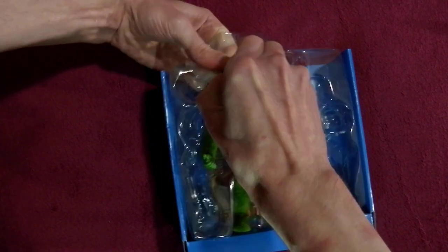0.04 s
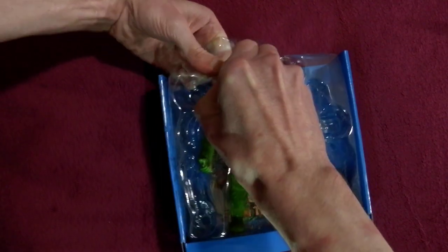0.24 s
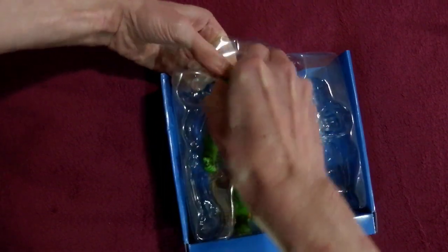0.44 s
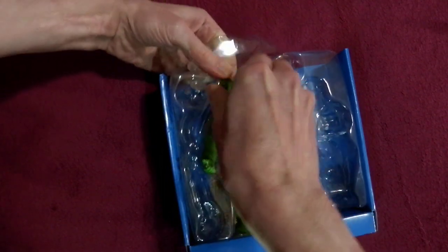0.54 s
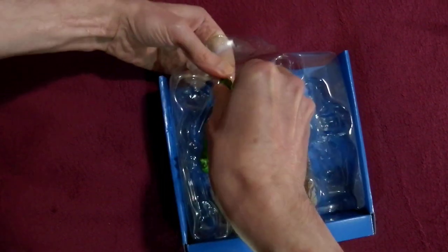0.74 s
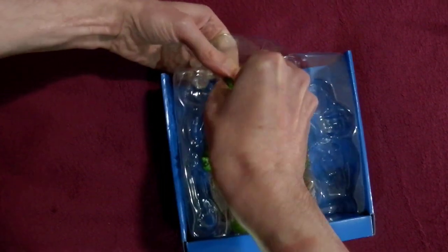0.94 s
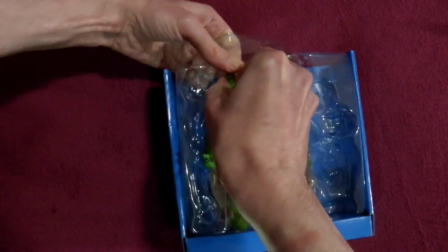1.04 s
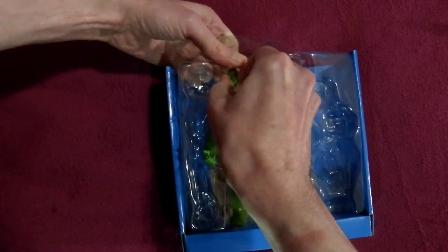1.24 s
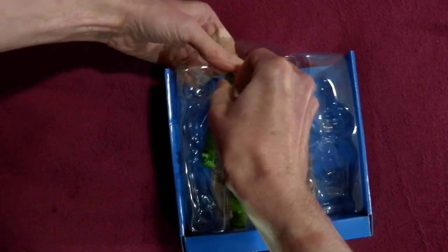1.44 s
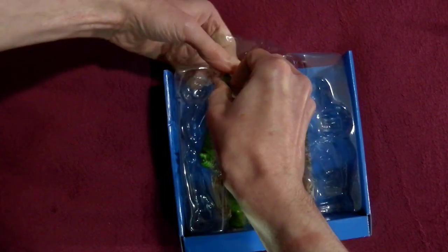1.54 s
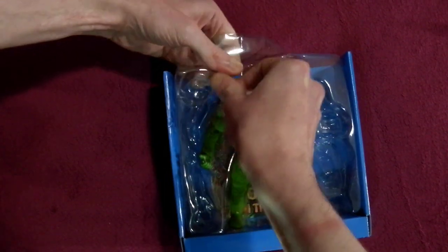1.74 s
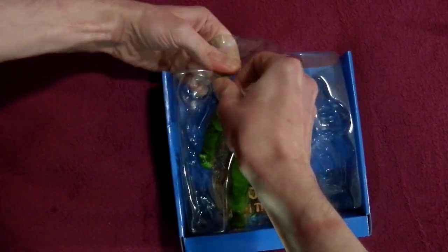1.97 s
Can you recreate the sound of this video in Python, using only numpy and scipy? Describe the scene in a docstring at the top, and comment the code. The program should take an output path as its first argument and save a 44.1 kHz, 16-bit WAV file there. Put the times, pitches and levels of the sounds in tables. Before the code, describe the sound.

Thin plastic packaging crackles under prying hands: sharp snaps at first, a quieter stretch, a dense loud burst midway, then looser crinkling with dull box thumps, recorded close in stereo in a small soft room.

```python
"""Prying a toy from its plastic tray

Hands pry a toy out of a thin plastic blister tray in a cardboard box, close to a stereo microphone.
Creases snap through and ring the sheet's short modes; tray and box thump as quickly fading tones.
Fingers rub and small creases crackle as shaped noise grains, with bass and bumps through the table.
A small soft room answers snaps and thumps with a short noise tail, over a steady room tone and hiss."""
import sys
import numpy as np
from scipy import signal
from scipy.fft import rfft, irfft
from scipy.io import wavfile
from scipy.ndimage import uniform_filter1d

SR = 44100
rng = np.random.default_rng(int(sys.argv[2]) if len(sys.argv) > 2 else 0)


def wav_record(signal):
    """Record a signal, one row per channel, as 16-bit PCM in the file named by sys.argv[1]."""
    frames = np.transpose(np.atleast_2d(signal))
    bounded = np.clip(frames, -1, 1)
    # unit amplitude maps onto the largest positive 16-bit level
    quanta = np.round(bounded * 32767).astype(np.int16)
    wavfile.write(sys.argv[1], SR, quanta)


N = 88464
T = np.arange(N) / SR

# snaps: the sheet's modes fall into a low, a middle and a high band
MIDDLE_HZ, HIGH_HZ = 4000, 8500
SNAP_DB, SCATTER_DB = -5, -3  # trim of all ringing; random spread of each mode's level
DETUNE, LOW_DETUNE = 0.0568, 0.016  # random pitch spread (fraction); low modes hardly shift
SHEET_LOW_HZ, SMALL_LOW_HZ = 1250, 3900  # the thin sheet has little bass; its upper modes even less
TICK_DB, TICK_S, TICK_LOW_HZ = -5, 0.00042, 5200  # the treble tick at the start of a snap
SNAP_RISE_S = 0.00014
RAGGED_PER_DB, LOUD_DB = 0.025, -18  # snaps weaker than this tear for longer
AFTER_DB, AFTER_S = -33, 0.004  # small cracks that follow a snap
FIRST_SLIP_DB = -3.5  # the first slip against all later ones
SLIP_CAP, SLIP_DIP = 6, 0.4  # largest raw slip; smallest response used when evening out the modes
# thumps
THUMP_DB, THUMP_CYCLES, THUMP_RISE_S = 2, 8.9, 0.00063  # an overtone falls 60 dB in this many cycles
THUMP_PHASE, THUMP_LOW_HZ = 0.4, 130  # phase scatter [radians]; the box radiates little bass
BOX_RING_DB, BOX_RING_T60_S, BOX_BEAT_HZ = -4.5, 0.061, 27.6
# handling
RUB_PER_S, RUB_SPREAD_DB, RUB_MS = 1200, 3, 7.9
COARSE_PER_S, COARSE_SPREAD_DB, COARSE_MS = 460, 4.5, 0.84
FINE_PER_S, FINE_SPREAD_DB, FINE_MS = 5000, 10, 0.52
FINE_GRAINS_DB = 2.5  # fine crackle grains against the soft rustle under them
GRAIN_CAP = 3  # limit on the random draw that sets a grain's level
SWELL_DB, SWELL_SIZE = 5, SR // 30  # uneven swelling; smoothing length [samples]
BASS_HZ = 80
# stereo: level of what differs between the ports, and of the rub's own share in it
APART_DB, RUB_APART_DB = -9.5, -5
# background
BUMP_S, BUMP_LEFT_DB = 0.0013, 12  # time to the top of the bump's envelope
TONE_DB, HISS_DB = -66.5, -86
EARLY_DB, EARLY_T60_S = -9, 0.017
ROOM_DB, ROOM_T60_S, ROOM_GAP_S = -13, 0.21, 0.011
ROOM_DULL_HZ, ROOM_TOP_T60_S = 8440, 0.24  # above this pitch the tail has its own fade
ROOM_LOW_DB = -19.5  # trim on the thumps that reach the room
TOP_HZ = 16100


def undb(db):
    """Turn decibels into a gain."""
    return 10 ** (np.asarray(db) / 20)


def unit(x):
    """Scale a sound to an rms level of 1."""
    return x / np.sqrt(np.mean(x ** 2))


def across(table, size):
    """Read a (frequency, value) table at every FFT bin, along a log frequency scale."""
    hz, value = np.array(table, float).T
    return np.interp(np.log(np.fft.rfftfreq(size, 1 / SR) + 1), np.log(hz + 1), value)


def colour(x, table):
    """Boost and cut frequencies by a table, then scale to rms 1."""
    return unit(irfft(rfft(x) * undb(across(table, N)), N))


def highpass(order, hz):
    """Make a filter that removes what lies below a frequency."""
    return signal.butter(order, hz, "highpass", fs=SR, output="sos")


def add(out, s, wave):
    """Lay a short sound down at s seconds."""
    i = max(int(s * SR), 0)
    out[..., i:i + wave.shape[-1]] += wave[..., :N - i]


def grains(per_s, spread_db, ms):
    """Scatter decaying noise grains at random times, with an exponential spread of level."""
    level = undb(spread_db * rng.exponential(size=N).clip(0, GRAIN_CAP))
    hit = (rng.random(N) < per_s / SR) * level
    decay = np.exp(-np.arange(400) / (ms * SR / 1000))
    return np.convolve(hit, decay)[:N] * rng.standard_normal(N)


def slip_burst(noise, t, tear):
    """A crease gives way in uneven slips: one at once, a burst lasting about tear, then small cracks."""
    envelope = t / tear * np.exp(-t / tear) + undb(AFTER_DB) * np.exp(-t / AFTER_S)
    # cubing makes a few slips stand out
    slips = (noise ** 3).clip(-SLIP_CAP, SLIP_CAP) * envelope
    slips[0] = undb(FIRST_SLIP_DB) * np.sqrt(np.sum(slips ** 2)) * SNAP_RISE_S / tear
    return slips / np.sqrt(np.sum(slips ** 2))


def snaps():
    """Slips of each crease ring detuned sheet modes; rows: common to both ports, differing."""
    # creases snapping through: (time [s], low level [dB], middle level [dB], high level [dB])
    snap_events = [(0.0067, -46, -43, -31), (0.0118, -45, -30, -28), (0.0175, -60, -42, -32),
                   (0.0326, -50, -57, -32), (0.0404, -52, -48, -40), (0.0515, -55, -50, -42),
                   (0.056, -33.5, -18.5, -24.5), (0.0855, -39, -59, -64), (0.0953, -47, -52, -37),
                   (0.1238, -39, -50, -37), (0.13, -34, -62, -9), (0.1378, -26.5, -24, -42),
                   (0.168, -57, -13, -17.5), (0.186, -64, -56, -18.5), (0.19, -60, -36, -30),
                   (0.2254, -25.5, -50, -14), (0.2424, -26.5, -11.5, -12), (0.299, -37, -68, -43),
                   (0.3847, -85, -62, -15), (0.3872, -32.5, -34, -23.5), (0.4067, -47, -37, -45),
                   (0.427, -46.5, -49, -43), (0.451, -48, -53, -33.5), (0.46, -50, -46, -52),
                   (0.493, -43.5, -42, -49), (0.503, -46, -54, -45.5), (0.6227, -45, -43, -44.5),
                   (0.6466, -48, -48, -49), (0.6572, -53, -49, -50), (0.665, -50, -43, -42.5),
                   (0.6827, -74, -78, -36.5), (0.7166, -52.5, -54, -51), (0.7392, -57, -45, -48.5),
                   (0.7715, -42.5, -47, -38), (0.7818, -48.5, -44, -41), (0.7973, -48, -59, -39),
                   (0.8168, -62, -49, -51), (0.8627, -43.5, -39, -37.5), (0.8973, -30.5, -31.5, -34.5),
                   (0.913, -38, -52, -30.5), (0.926, -36.5, -31, -20.5), (0.9417, -39, -39, -30),
                   (0.9541, -28, -23, -17), (0.9594, -48, -47, -27), (0.9689, -33.5, -41, -27),
                   (0.9754, -29, -43, -32), (0.9786, -23, -34, -28), (0.9851, -32, -36, -34),
                   (0.9894, -23, -15.5, -21.5), (0.9948, -36, -49, -46), (1, -56, -42, -34),
                   (1.0109, -18.5, -16, -22), (1.0154, -39, -35, -40), (1.0215, -28.5, -45, -40),
                   (1.0266, -44, -38, -38), (1.0306, -33, -44, -39), (1.0369, -47, -48, -39),
                   (1.0412, -54, -53, -57), (1.044, -43, -45, -42), (1.0593, -16, -15, -10.5),
                   (1.1092, -68, -37, -31.5), (1.153, -94, -20, -20.5), (1.265, -48, -56, -30.5),
                   (1.279, -62, -34, -43), (1.2991, -36, -37, -29), (1.3176, -51, -51, -44),
                   (1.4007, -77, -43, -41), (1.4167, -55, -55, -60), (1.4263, -53, -52, -56),
                   (1.439, -52, -57, -58), (1.4521, -45, -39, -40), (1.461, -42, -40, -54),
                   (1.4661, -45, -35, -21), (1.4724, -37.5, -35, -34), (1.4807, -47, -27, -32),
                   (1.4962, -36.5, -25, -31.5), (1.5369, -60, -32.5, -37), (1.549, -32.5, -55, -66),
                   (1.574, -31, -30, -24), (1.592, -43, -32.5, -45), (1.6294, -27.5, -26.5, -26),
                   (1.6421, -34.5, -28, -40), (1.651, -31, -28, -28), (1.6601, -29, -37, -26),
                   (1.6635, -38, -25, -30), (1.672, -60, -37, -36), (1.7424, -40, -31.5, -36),
                   (1.767, -51, -31.5, -48), (1.777, -55, -67, -33.5), (1.8122, -36.5, -55, -48),
                   (1.8155, -46, -41, -42), (1.8574, -43, -30, -31.5), (1.8668, -38, -39, -34),
                   (1.882, -38, -25.5, -28), (1.8896, -40, -28, -36), (1.8947, -36, -31.5, -26),
                   (1.9034, -34, -25, -26), (1.9122, -35, -56, -26), (1.9194, -22, -14, -15.5),
                   (1.929, -32, -28, -37), (1.9396, -39, -50, -34), (1.953, -67, -35, -46),
                   (1.9725, -41, -46, -31.5)]
    # modes of the sheet: (frequency [Hz], level within its band [dB], time to fall 60 dB [s])
    sheet_modes = [(1346, -12.5, 0.01), (1700, -12, 0.0067), (2333, 1.5, 0.011), (2997, 0, 0.0057),
                   (3450, -17.5, 0.017), (4950, -26, 0.036), (5460, -0.5, 0.022), (6290, 6.5, 0.018),
                   (7240, 20.5, 0.0086), (9290, 3.5, 0.011), (10090, 0.5, 0.0039), (11210, 4.5, 0.0032),
                   (11890, -1, 0.017), (13270, -12, 0.018)]
    out, t = np.zeros((2, N)), T[:900]
    # every mode is doubled, and detuning splits the pair
    hz, db, t60 = np.tile(np.array(sheet_modes, float), (2, 1)).T[:, :, None]
    group = ((hz > MIDDLE_HZ) * 1 + (hz > HIGH_HZ))[:, 0]
    power = np.bincount(group, undb(2 * db[:, 0]))[group]
    draw = rng.standard_normal((len(snap_events), 4, len(hz), 1))
    noise = rng.standard_normal((len(snap_events), 3, len(t)))
    treble, small = highpass(4, TICK_LOW_HZ), highpass(4, SMALL_LOW_HZ)
    rise = 1 - np.exp(-t / SNAP_RISE_S)
    for (s, *band), d, n in zip(snap_events, draw, noise):
        tear = SNAP_RISE_S * np.exp(RAGGED_PER_DB * max(LOUD_DB - max(band), 0))
        slips = slip_burst(n[2], t, tear)

        mode_db = db + SCATTER_DB * d[0] + np.array(band)[group, None] + SNAP_DB
        gain = undb(mode_db) / np.sqrt(power)[:, None]
        detune = np.where(hz > MIDDLE_HZ, DETUNE, LOW_DETUNE) * d[1]
        turn = 2 * np.pi * hz * (1 + detune) * t
        # even out how strongly this burst happens to drive each mode
        drive = np.abs(slips @ np.exp(1j * turn).T)
        gain = gain / drive.clip(SLIP_DIP)[:, None]
        ring = gain * np.exp(-np.log(1000) * t / t60)
        both = np.array([ring * np.sin(turn), ring * np.cos(turn) * d[3]])
        low = both[:, group == 0].sum(1)
        upper = signal.sosfilt(small, both[:, group > 0].sum(1))
        ringing = signal.fftconvolve(low + upper, slips[None], axes=1)[:, :len(t)]

        # a ragged tear makes the tick longer and weaker
        tick_s = TICK_S + tear
        tick = undb(band[2] + TICK_DB) * signal.sosfilt(treble, n[:2])
        tick = tick * np.exp(-t / tick_s) * np.sqrt(TICK_S / tick_s)
        add(out, s, ringing + rise * tick)
    return signal.sosfilt(highpass(4, SHEET_LOW_HZ), out)


def thumps():
    """A thump or hollow knock has overtones that fade in a few cycles, and a longer beating tone."""
    # thumps of the tray in its box; the two rows above 1 kHz are the hollow lower knock of a snap:
    # (time [s], level [dB], pitch [Hz])
    thump_events = [(0.0077, -40, 465), (0.057, -26, 724), (0.0863, -47, 495), (0.1311, -34.5, 443),
                    (0.168, -21, 659), (0.1831, -33.5, 459), (0.2247, -35, 688), (0.2254, -34, 1497),
                    (0.2429, -43, 402), (0.3022, -43.5, 444), (0.4923, -42, 614), (0.5047, -43, 403),
                    (0.6668, -41, 505), (0.719, -47, 553), (0.7717, -38.5, 324), (0.799, -39.5, 570),
                    (0.896, -36.5, 603), (0.9151, -33, 542), (0.9282, -34, 404), (0.9431, -31, 485),
                    (0.9599, -30, 381), (0.9701, -36, 516), (0.9783, -32.5, 367), (0.982, -35.5, 496),
                    (0.996, -32, 534), (1.003, -37, 528), (1.0372, -37, 415), (1.057, -37.5, 358),
                    (1.2987, -43.5, 1337), (1.418, -45.5, 440), (1.4611, -42, 408), (1.48, -38.5, 536),
                    (1.4964, -38.5, 267), (1.5404, -48, 435), (1.6612, -22, 254), (1.6612, -23, 610),
                    (1.7543, -36, 452), (1.8114, -33, 568), (1.8582, -44, 590), (1.8617, -36.5, 231),
                    (1.8825, -29, 601), (1.916, -27, 596), (1.937, -42.5, 206), (1.979, -44, 149),
                    (1.991, -46, 404)]
    # overtones of a thump or knock: (ratio to the pitch, level [dB])
    overtones = [(1.185, -4.5), (0.447, -13.5), (1.51, -21.5), (1.854, -2.5), (7.8, -36)]
    out, t = np.zeros(N), T[:4000]
    scatter = rng.standard_normal((len(thump_events), len(overtones)))
    for (s, db, hz), phases in zip(thump_events, scatter):
        ring = np.zeros(len(t))
        for (ratio, tone_db), phase in zip(overtones, phases):
            tone = np.sin(2 * np.pi * hz * ratio * t + THUMP_PHASE * phase)
            decay = np.exp(-hz * ratio * t * np.log(1000) / THUMP_CYCLES)
            ring += undb(tone_db) * tone * decay
        box = np.sin(2 * np.pi * hz * t) * np.cos(2 * np.pi * BOX_BEAT_HZ * t)
        ring += undb(BOX_RING_DB) * box * undb(-60 * t / BOX_RING_T60_S)
        add(out, s, undb(db + THUMP_DB) * ring * (1 - np.exp(-t / THUMP_RISE_S)))
    # the minus sign makes the first push go the other way
    return signal.sosfilt(highpass(2, THUMP_LOW_HZ), -out)


def hands():
    """Rub and crackle are noise grains, fine crackle lies on a soft rustle, bass is low noise."""
    # handling: (time [s], rub of tray and box level [dB], fine crackle level [dB],
    # bass through the table level [dB], coarse crackle level [dB])
    handling = [(0.0, -57, -52.5, -51.5, -69), (0.11, -53, -66, -64, -47.5), (0.24, -62.5, -56.5, -71, -60),
                (0.4, -60, -79, -66, -102), (0.469, -55.5, -72, -70, -102), (0.6, -59.5, -82, -70, -62.5),
                (0.71, -60, -77, -72.5, -63.5), (0.84, -57.5, -80.5, -57.5, -68.5),
                (0.91, -52, -87, -68, -94), (1.022, -47, -73, -56.5, -47), (1.1, -113, -64, -76, -78),
                (1.252, -65.5, -80.5, -86, -91), (1.36, -65, -73, -68, -71.5), (1.49, -56, -79, -70, -55.5),
                (1.61, -48.5, -59, -58.5, -61.5), (1.75, -48.5, -64, -59, -55.5),
                (1.88, -47, -75, -60, -54.5), (2.0, -52.5, -82, -70, -71)]
    # shaping of rub, fine crackle and coarse crackle, each: (frequency [Hz], boost [dB])
    rub_colour = [(90, -49), (140, 3), (220, 8.5), (450, 6), (720, 4.5), (900, -6.5), (1500, -16.5),
                  (3000, -25)]
    fine_colour = [(2000, 5.5), (3500, 2), (4500, 2), (7000, 9.5), (10000, 8), (13500, -2), (16000, -9)]
    coarse_colour = [(600, -12), (1000, 14.5), (2300, -3), (3500, -6.5), (6000, -1)]
    s, *levels = np.array(handling, float).T
    rub_gain, fine_gain, bass_gain, coarse_gain = (undb(np.interp(T, s, db)) for db in levels)

    # both crackles swell and fade unevenly together
    slow = uniform_filter1d(rng.standard_normal(N), SWELL_SIZE)
    swell = undb(SWELL_DB * unit(uniform_filter1d(slow, SWELL_SIZE)))

    rub = colour(grains(RUB_PER_S, RUB_SPREAD_DB, RUB_MS), rub_colour) * rub_gain
    rub_apart = colour(rng.standard_normal(N), rub_colour) * rub_gain
    coarse = colour(grains(COARSE_PER_S, COARSE_SPREAD_DB, COARSE_MS), coarse_colour)
    coarse = coarse * coarse_gain * swell

    fine = []
    for _ in range(2):
        rustle = colour(rng.standard_normal(N), fine_colour)
        crackle = colour(grains(FINE_PER_S, FINE_SPREAD_DB, FINE_MS), fine_colour)
        fine.append((rustle + undb(FINE_GRAINS_DB) * crackle) * fine_gain * swell)

    low = signal.butter(2, [25, BASS_HZ], "bandpass", fs=SR, output="sos")
    bass = unit(signal.sosfilt(low, rng.standard_normal((2, N)))) * bass_gain

    common = rub + coarse + fine[0] + bass[0]
    # the bass is raised here to cancel APART_DB in scene()
    differing = fine[1] + undb(RUB_APART_DB) * rub_apart + undb(-APART_DB) * bass[1]
    return np.array([common, differing])


def bumps():
    """Short low pushes through the table, quick to rise and fade, stronger in the left port."""
    # soft bumps: (time [s], level [dB], pitch [Hz])
    bump_events = [(0.029, -52, 61), (0.127, -57, 52.3), (1.622, -42, 41.8), (1.917, -44, 49)]
    out, t = np.zeros(N), T[:4000]
    envelope = t / BUMP_S * np.exp(1 - t / BUMP_S)
    for s, db, hz in bump_events:
        add(out, s, undb(db) * np.sin(2 * np.pi * hz * t) * envelope)
    return out * undb([[BUMP_LEFT_DB], [0]])


def room(x):
    """Close echoes from box and table, then a thin noise tail, unrelated left and right."""
    t = T[:SR // 2]

    def fade(db, t60):
        """A decay with a set total energy, falling 60 dB in t60 seconds."""
        return undb(db) * unit(undb(-60 * t / t60)) / np.sqrt(len(t))

    air = rng.standard_normal((2, len(t)))
    dull = signal.sosfiltfilt(signal.butter(2, ROOM_DULL_HZ, fs=SR, output="sos"), air)
    early = fade(EARLY_DB, EARLY_T60_S) * air
    late = fade(ROOM_DB, ROOM_T60_S) * dull + fade(ROOM_DB, ROOM_TOP_T60_S) * (air - dull)
    echoes = early + late * (t > ROOM_GAP_S)
    return signal.fftconvolve(x[None], echoes, axes=1)[:, :N]


def room_tone():
    """Steady, mostly low noise, with a weaker part that is opposite in left and right."""
    # shape of the room tone: (frequency [Hz], boost [dB])
    tone_colour = [(30, 20), (150, 22.5), (400, 14.5), (800, 2.5), (1500, -76)]
    common, differing = [undb(TONE_DB) * colour(rng.standard_normal(N), tone_colour) for _ in range(2)]
    return common + undb(APART_DB) * differing * np.array([[1], [-1]])


def scene():
    """All sources reach the two ports, whose level and timing differ with frequency."""
    # level difference of the ports: (frequency [Hz], left minus right level [dB])
    port_level = [(28, 6), (75, 0), (200, -4.5), (700, -5), (2400, -2), (4400, 0), (6500, 8), (8500, 1),
                  (11000, -9.5), (15000, -9.5)]
    # phase difference of the ports: (frequency [Hz], lead of the left [radians])
    port_lead = [(0, -0.086), (1640, 0.35), (2150, -2), (3010, 1), (4820, 1), (6200, -5.1), (8350, -0.13),
                 (10200, -0.81), (10700, 1.3), (13100, 3), (16000, -1.4)]
    snap, thump = snaps(), thumps()
    common, differing = snap + hands()
    near = common + thump + undb(APART_DB) * differing * np.array([[1], [-1]])
    echoes = room(snap[0] + undb(ROOM_LOW_DB) * thump)
    total = near + bumps() + echoes + room_tone()
    # each port takes half of the difference, in opposite directions
    half = undb(across(port_level, N) / 2) * np.exp(0.5j * across(port_lead, N))
    return irfft(rfft(total) * np.array([half, 1 / half]), N)


def record(dry):
    """Add faint microphone hiss, then cut the top of the treble steeply."""
    wet = dry + undb(HISS_DB) * rng.standard_normal(dry.shape)
    return signal.sosfilt(signal.ellip(8, 0.2, 70, TOP_HZ, fs=SR, output="sos"), wet)


dry = scene()
out = record(dry)
wav_record(out)
```